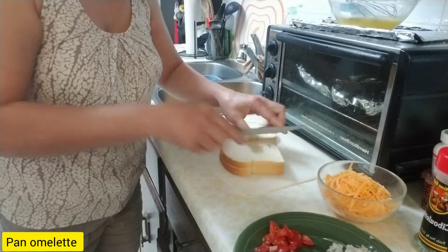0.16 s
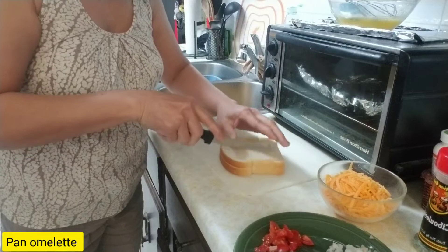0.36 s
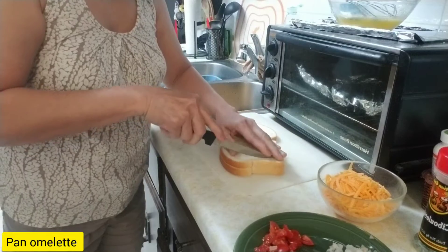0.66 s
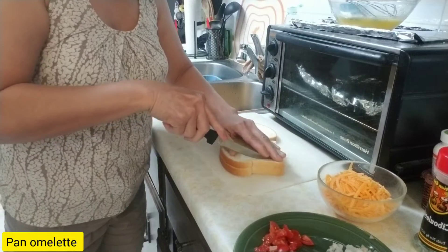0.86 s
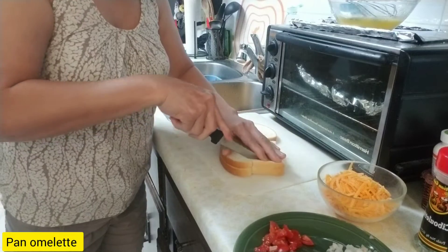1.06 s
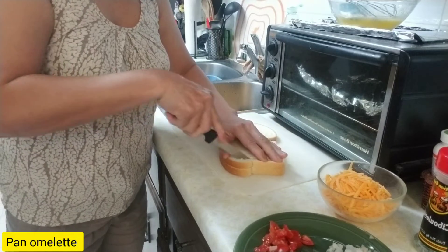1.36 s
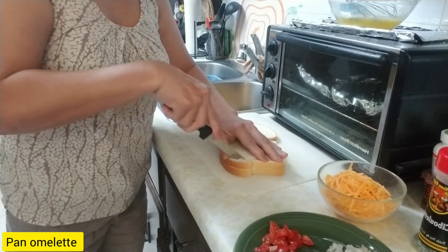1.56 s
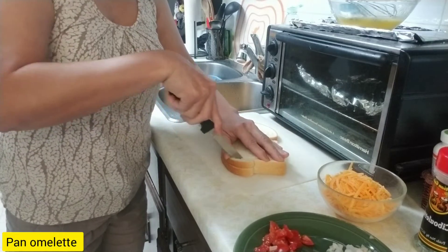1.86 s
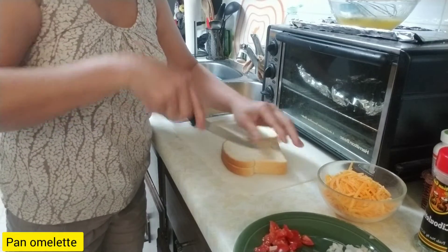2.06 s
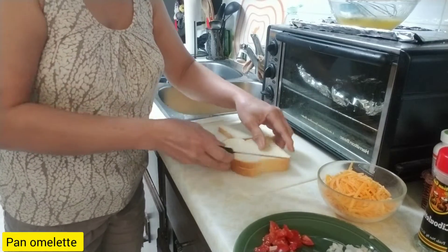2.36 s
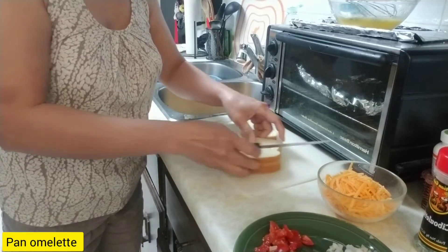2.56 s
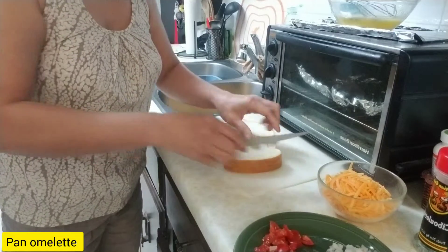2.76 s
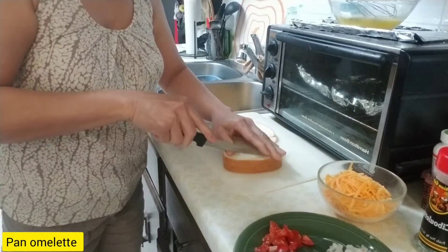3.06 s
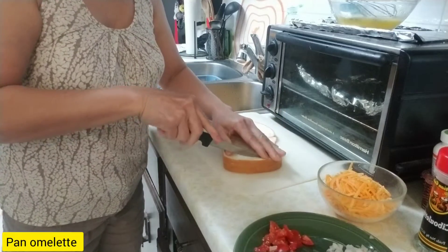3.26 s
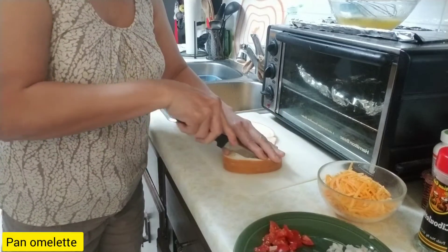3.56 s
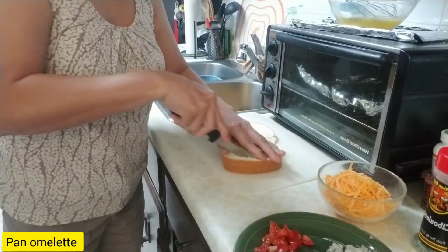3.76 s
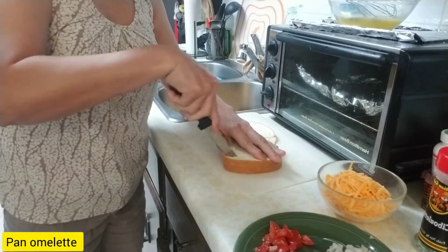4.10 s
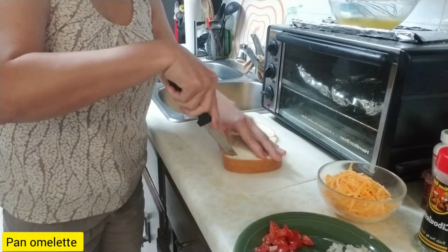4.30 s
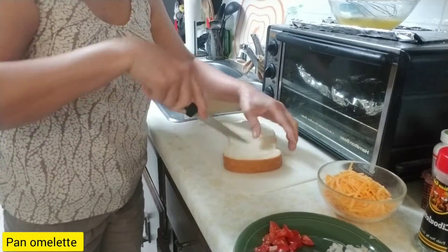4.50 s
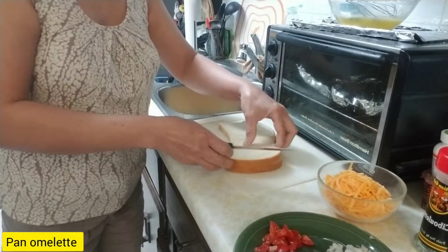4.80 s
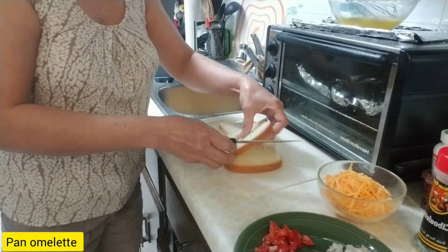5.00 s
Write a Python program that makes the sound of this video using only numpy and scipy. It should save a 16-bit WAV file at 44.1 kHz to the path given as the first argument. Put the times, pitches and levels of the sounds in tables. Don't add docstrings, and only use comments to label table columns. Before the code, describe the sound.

A steady low fan hum and rumble fills a small home kitchen, gently wavering, with faint treble hiss from a small stereo microphone pair. A barely audible scuff fades at the very start, and tiny ticks come around 0.6 to 0.85 s. From about 1.4 s a serrated knife cuts through soft bread: short gritty rasps grow into hard, hollow knocks on a plastic board, with a deep boom from the counter near 1.65 s and the loudest crack at 1.72 s, fading by 1.9 s. At 2.25 to 2.75 s fingers rub the slices, soft, dry and papery. Only the fan remains until about 3.7 s, when sawing resumes, bursting into a rapid run of sharp knocks from 3.87 to 4.07 s. Dull shifting of bread follows at 4.15 to 4.3 s, then a small tap and brief blade slide at 4.6 s. The knife is close, slightly right, with short reflections.

```python
import sys
import numpy as np
from scipy import signal
from scipy.fft import rfft, irfft, next_fast_len
from scipy.io import wavfile
from scipy.ndimage import uniform_filter1d, map_coordinates

SR = 44100
rng = np.random.default_rng(int(sys.argv[2]) if len(sys.argv) > 2 else 0)


def put_to_file(sound):
    columns = np.atleast_2d(sound).T
    safe = np.clip(columns, -1, 1)
    whole_steps = np.round(safe * 32767)
    wavfile.write(sys.argv[1], SR, whole_steps.astype(np.int16))


def boost_factor(decibels):
    exponent = np.asarray(decibels, float) / 20
    return 10 ** exponent


N = 226718


def unit(x):
    return x / np.sqrt(np.mean(x ** 2) + 1e-20)


def along(points, hz):
    f, v = np.transpose(points)
    return np.interp(np.log(hz + 1), np.log(f + 1), v)


def wobble(rate):
    knots = rng.standard_normal(int(N * rate / SR) + 4)
    return map_coordinates(knots, [np.arange(N) * rate / SR])


def filtered(x, response):
    m = next_fast_len(N + SR // 2)
    spectrum = rfft(x, m) * response(np.fft.rfftfreq(m, 1 / SR))
    return irfft(spectrum, m)[..., :N]


def modes(table, top_hz=30000):
    def response(f):
        contact = (1 - (f / top_hz) ** 2 + 1.5j * f / top_hz) ** -2
        ringing = sum(boost_factor(db) * 1j * f * w / (c * c - f * f + 1j * f * w) for c, w, db in table)
        return contact * ringing
    return response


def pair(response, alike):
    def mid_side(hz):
        turn = np.arccos(np.clip(along(alike, hz), -1, 1)) / 2
        return response(hz) * [np.cos(turn), np.sin(turn)]
    mid, side = filtered(rng.standard_normal((2, N)), mid_side)
    return unit(np.array([mid + side, mid - side]))


def grains(rate, spread_db):
    present = rng.random(N) < rate / SR
    size = boost_factor(spread_db * rng.standard_normal(N))
    return unit(present * size * rng.standard_normal(N))


def strokes(table, levels_db, depths, hold):
    start_db, end_db = -6, -35.5
    t, out = np.arange(N) / SR, 0
    for (s, rise, fall, *_), peaks_db in zip(table, np.transpose(levels_db)):
        falling = np.clip((t - s - rise) / fall, 0, 10) ** hold
        shape_db = np.interp(t, [s, s + rise], [start_db, 0], -300) + end_db * falling
        out = out + boost_factor(peaks_db[:, None] + np.outer(depths, shape_db))
    return uniform_filter1d(out, size=100)


# time_s, level_db
DRAUGHT = [(0.0, -48.5), (0.33, -50), (1.22, -50), (1.69, -48), (1.89, -50.5), (2.52, -49), (3.14, -50.5),
           (3.99, -48), (4.39, -50), (5.14, -50)]
# time_s, level_db
LOWEST_MODE = [(0.0, -71), (0.11, -52.5), (2.13, -47.5), (2.26, -60), (2.32, -49), (2.69, -46.5),
               (2.8, -68), (2.91, -47), (3.09, -56.5), (3.19, -43), (3.51, -51.5), (3.79, -45.5),
               (3.85, -63), (3.89, -48), (4.04, -42), (4.12, -55), (4.58, -48.5), (5.14, -53.5)]
# pitch_hz, width_hz, level_db
ROOM_MODES = [(122.9, 10.5, 0), (194.5, 17.7, -7), (288.2, 10.7, -9), (351.7, 17.7, -10), (432.7, 62, -13)]
# pitch_hz, density_db (per Hz)
AIR = [(25, -21), (48, -4), (90, -8.5), (170, -8), (470, -10), (763, -26), (1050, -26.5), (1900, -39.5),
       (4000, -48.5), (5200, -76), (8800, -120)]
# pitch_hz, likeness (-1 to 1)
ALIKE = [(60, 0.79), (130, 0.96), (290, 0.85), (640, 0.32), (1410, -0.23), (3100, -0.042), (6820, 0.64),
         (15000, 0.63)]


def fan():
    t = np.arange(N) / SR
    draught_db = np.interp(t, *np.transpose(DRAUGHT))
    draught_db = draught_db - draught_db.mean()
    second, higher, air = (boost_factor(db + draught_db + 0.84 * wobble(2.29)) for db in (-58.5, -49.5, -51.5))

    def sharp(table):
        return lambda hz: sum(abs(modes([mode])(hz)) ** 2 for mode in table)

    flutter_db = 1.5 * (wobble(5.8) + wobble(16))
    level = boost_factor(3 + np.interp(t, *np.transpose(LOWEST_MODE)) + flutter_db)
    lowest = level * np.sin(2 * np.pi * 57.75 * t + 0.85 * wobble(3.05) + 0.58 * wobble(14))
    swell = boost_factor(wobble(16) / 2 + wobble(25) / 2)
    broad = swell * air * pair(lambda hz: boost_factor(along(AIR, hz)), ALIKE)
    mains = boost_factor(-52 + 1.87 * wobble(4)) * np.sin(2 * np.pi * 120.1 * t + 0.25 * wobble(4.03))
    resonant = second * pair(sharp(ROOM_MODES[:1]), ALIKE) + higher * pair(sharp(ROOM_MODES[1:]), ALIKE)
    return broad + lowest + mains + resonant


# start_s, rise_s, fall_s, scuff_db, dryness_db
BRUSHES = [
    (0, 0.0022, 0.028, -56, -3),
    (2.262, 0.019, 0.037, -46.5, -17),
    (2.305, 0.0065, 0.094, -51, -4.5),
    (2.35, 0.099, .06, -62.5, -6),
    (2.52, 0.047, 0.34, -73, -7),
    (2.465, 0.024, 0.083, -57.5, -6),
    (2.585, 0.047, .07, -63.5, -4),
    (2.68, 0.012, 0.078, -62.5, 1),
    (4.15, 0.042, 0.052, -56.5, -16),
    (4.239, 0.029, 0.077, -54.5, -22),
]
# pitch_hz, width_hz, level_db
LOAF = [(750, 41, -4), (873, 270, 0), (1180, 110, -3.5), (1870, 710, -5.5), (2830, 370, -16),
        (2500, 1400, -3.5), (4250, 630, 5), (4930, 290, 4.5), (5600, 1200, -1.5)]
BRUSH_DEPTH, BRUSH_HOLD = 0.58, 1.34


def brushing():
    scuff_db, dry_db = np.transpose(BRUSHES)[3:]
    rasp_db = scuff_db + dry_db
    gains = strokes(BRUSHES, [scuff_db, rasp_db, rasp_db - 7], [BRUSH_DEPTH, 1.5, 1.5], BRUSH_HOLD)
    scuff, rasp, whisper = gains * grains(rate=5800, spread_db=4.0)
    low = filtered(boost_factor(12.5) * scuff, modes(LOAF[:3], top_hz=1570))
    middle = filtered(boost_factor(10) * rasp, modes(LOAF[3:6], top_hz=3950))
    return low + middle + filtered(boost_factor(5.5) * whisper, modes(LOAF[6:], top_hz=10800))


# pitch_hz, width_hz, level_db
BOARD = [(790, 135, 1.5), (936, 29, -1), (1060, 31, 3), (880, 460, -3), (1326, 134, 2.5), (1455, 260, -5),
         (1553, 154, -4), (1736, 300, -11.5), (2550, 370, -11.5)]
# pitch_hz, width_hz, level_db
COUNTER = [(344.5, 20.4, 0), (461, 36, -2), (522, 138, -2), (600, 123, -8.5), (435, 380, -8.5)]
# pitch_hz, width_hz, level_db
BLADE = [(2530, 210, 5.5), (3400, 120, -3), (3950, 250, 4), (4780, 1100, -2.5), (6300, 4600, -8.5)]


def bodies(dull, bright, counter, blade):
    low = filtered(dull, modes(BOARD[:4], top_hz=1460))
    high = filtered(bright, modes(BOARD[4:], top_hz=2090))
    below = filtered(counter, modes(COUNTER, top_hz=986))
    return low + high + below + filtered(blade, modes(BLADE, top_hz=11900))


# time_s, peak_db, heft_db (on the counter), hardness_db
KNOCKS = [(0.593, -54, -4, -1), (0.713, -66, -4, -5), (0.85, -56, 4, 3), (1.433, -38, 3, -3),
          (1.448, -30, 5.5, -9), (1.525, -24, -0.5, -15), (1.538, -19.5, -18, -14), (1.6338, -31.5, 11, -6),
          (1.6525, -33, 10, 4), (1.671, -23.5, 0, 0), (1.7058, -15.5, -5.5, -9), (1.712, -21, -3, -10),
          (1.7215, -6.5, -9.5, -3), (1.729, -31, -21, -9), (1.819, -39.5, 20, 5), (2.266, -45, 9, -7),
          (3.685, -49, 11.5, 11), (3.78, -41.5, 12, 6), (3.799, -29.5, -11, -1), (3.871, -27.5, 0.5, -6),
          (3.883, -28.5, 1, 13), (3.8945, -9.5, -13, -6), (3.8977, -19, -8, 9.5), (3.9107, -9, -9.5, 7),
          (3.93, -17, -18, -16), (4.0301, -27.5, 5, 6), (4.041, -10.5, -7, 2), (4.0487, -21.5, -1, -4),
          (4.0705, -10, -18, 0), (4.604, -31.5, -3.5, 3)]
# time_s, level_db
SHUDDERS = [
    (1.636, -23),
    (1.652, -25),
    (1.721, -49),
    (3.781, -34),
]


def knocks():
    s, db, heft_db, hard_db = np.transpose(KNOCKS)
    tick_db = db + hard_db - 0.29 * heft_db - 15.5
    blows = np.zeros((4, N))
    at = np.round((s + .0006) * SR).astype(int)
    blows[:, at] = -boost_factor([db + 18.5, db + hard_db + 10.5, db + heft_db + 30, tick_db])
    s, db = np.transpose(SHUDDERS)
    shudder = np.zeros(N)
    shudder[np.round(s * SR).astype(int)] = boost_factor(db + 46)
    return bodies(*blows) + filtered(shudder, modes([(107, 5.2, 0.0073)], top_hz=254))


# start_s, rise_s, fall_s, pressure_db, bite_db (of the teeth)
STROKES = [(1.292, 0.055, .04, -75.5, -84), (1.429, 0.017, 0.094, -46.5, -54.5),
           (1.524, 0.019, 0.079, -36, -52), (1.632, 0.021, 0.061, -29.5, -44.5),
           (1.705, 0.014, 0.034, -25.5, -27), (1.74, 0.025, 0.13, -57, -83), (1.82, 0.03, 0.1, -59, -54),
           (3.674, 0.022, 0.066, -44.5, -56.5), (3.764, 0.037, 0.13, -48.5, -74),
           (3.87, 0.03, 0.039, -26.5, -33.5), (3.898, 0.014, 0.11, -43, -39),
           (4.031, 0.01, 0.025, -51, -29), (4.048, 0.022, 0.053, -32.5, -30.5)]


def sawing():
    press_db, bite_db = np.transpose(STROKES)[3:]
    crumb_db = -44.5 + 0.33 * bite_db
    weight_db = -12 + 0.58 * press_db
    levels_db = [press_db, bite_db, crumb_db, weight_db]
    dull, bright, crumbs, weight = strokes(STROKES, levels_db, [1, 1.07, 1.35, 0.7], hold=1.31)
    slips = grains(rate=1100, spread_db=2.5)
    tearing = boost_factor(0.42 * wobble(99)) * grains(rate=9200, spread_db=-2.0)
    return bodies(boost_factor(9.0) * dull * slips, boost_factor(11) * bright * slips,
                  boost_factor(10.5) * weight * slips, boost_factor(1.5) * crumbs * tearing)


# start_s, rise_s, fall_s, level_db
LIFT = [
    (4.595, .014, 0.063, -52),
]
# pitch_hz, width_hz, level_db
FLAT = [(610, 300, 3.5), (870, 220, 4.5), (1205, 143, 1.5), (2140, 290, -7), (2630, 390, -5),
        (4600, 830, -7)]


def lifting():
    gains = strokes(LIFT, [np.transpose(LIFT)[3]], [BRUSH_DEPTH], BRUSH_HOLD)
    slide, = gains * grains(rate=2800, spread_db=4.5)
    return filtered(boost_factor(12) * slide, lambda hz: sum(modes([mode], top_hz=7000)(hz) ** 2 for mode in FLAT))


# delay_s, level_db
NEAR = [
    [(.0012, -19), (.0034, -26), (.0057, -4), (.0091, -23)],
    [(.002, -15.5), (.0029, -29), (.0048, -16.5), (.0078, -37)],
]


def nearby(x):
    def echoes(f, side):
        arrivals = sum(boost_factor(db) * np.exp(-2j * np.pi * f * s) for s, db in side)
        return arrivals / (1 + (500 / (f + 1)) ** 2)

    def direct(f):
        return boost_factor([[-1.3], [1.3]]) * np.exp(-2j * np.pi * f * np.array([[.00004], [0]]))

    return filtered(x, lambda f: direct(f) + [echoes(f, side) for side in NEAR])


# pitch_hz, t60_s
KITCHEN = [(150, 0.12), (600, 0.14), (2000, 0.18), (8000, 0.17)]


def kitchen(x):
    out, step = np.zeros((2, N + SR)), SR // 10
    for at in range(0, N, step):
        hz, t, z = signal.stft(rng.standard_normal((2, SR // 3)), SR, nperseg=256)
        apart = np.clip(hz / 700, 0, 1)[:, None]
        z = z[0] * np.sqrt(1 - apart ** 2 / 2) + np.array([z[1], -z[1]]) * apart / np.sqrt(2)
        decay = boost_factor(-60 * t / along(KITCHEN, hz)[:, None])
        tail = signal.istft(z * decay, SR, nperseg=256)[1]
        wet = signal.fftconvolve(x[None, at:at + step], tail / np.linalg.norm(tail[0]), axes=1)
        out[:, at + 130:][:, :wet.shape[1]] += wet
    return out[:, :N]


def scene():
    knife = sawing() + knocks() + brushing() + lifting()
    return nearby(knife) + boost_factor(-1.0) * kitchen(knife) + fan()


def roll_off(x):
    return signal.sosfilt(signal.butter(12, 17090, fs=SR, output="sos"), x)


# pitch_hz, level_db
PORTS = [(6900, 0), (7600, -6.5), (8600, -17), (10500, -5), (13500, -11)]
# pitch_hz, left_minus_right_db
LEAN = [(60, -1), (200, -1.2), (600, 0), (2000, -2.2), (5000, -3.5)]
# pitch_hz, density_db (per Hz)
HISS = [(1470, -35), (2500, -11), (3430, -14), (5010, -9.5), (7320, -17.5), (9270, -19), (12100, -3),
        (15100, -1), (16100, -3.5), (16500, -45)]
# pitch_hz, left_minus_right_db
HISS_LEAN = [(6000, -3), (9800, 1), (12000, -1), (15000, -6.5)]


def record(dry):
    sides = np.array([[.5], [-.5]])
    leaning = filtered(dry, lambda hz: boost_factor(along(PORTS, hz) + along(LEAN, hz) * sides))
    treble = uniform_filter1d(np.diff(dry[0], n=2, prepend=[0, 0]) ** 2, size=250)
    loudness = np.sqrt(abs(treble)) ** 0.54
    likeness = [(3000, .05), (6000, 0.05), (8000, 0.41), (10500, 1.0), (14500, 0.9)]
    hiss = pair(lambda hz: boost_factor(along(HISS, hz)), likeness)
    hiss = filtered(hiss, lambda hz: boost_factor(along(HISS_LEAN, hz) * sides))
    steady = boost_factor(-72.5 + 0.96 * wobble(18))
    following = boost_factor(-36 + 1.2 * wobble(36)) * loudness
    mix = filtered(leaning + hiss * (steady + following), lambda hz: hz < 15770)
    return roll_off(mix)


dry = scene()
out = record(dry)
put_to_file(out)
```